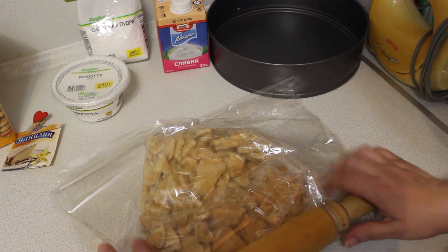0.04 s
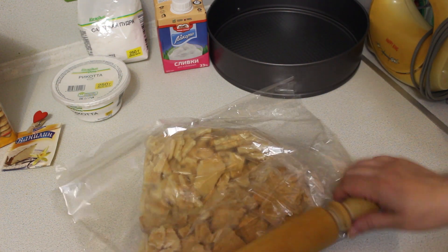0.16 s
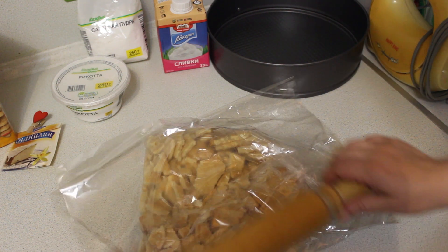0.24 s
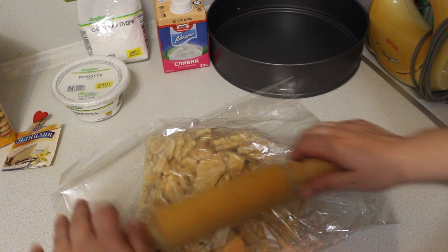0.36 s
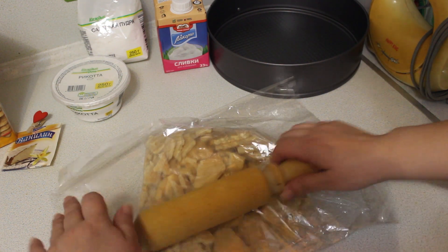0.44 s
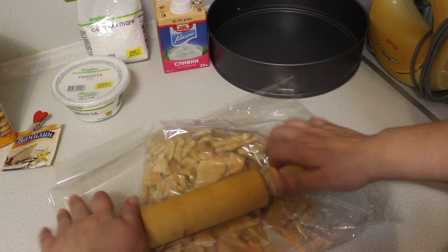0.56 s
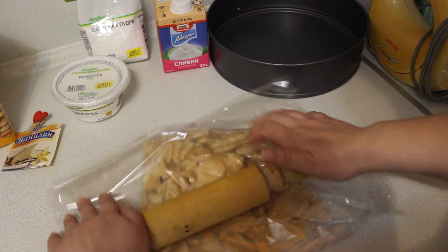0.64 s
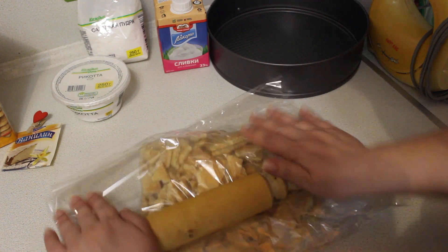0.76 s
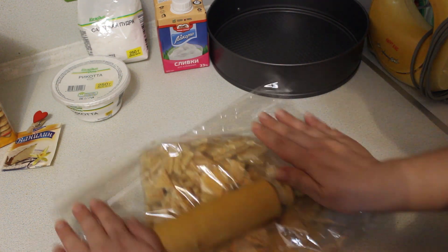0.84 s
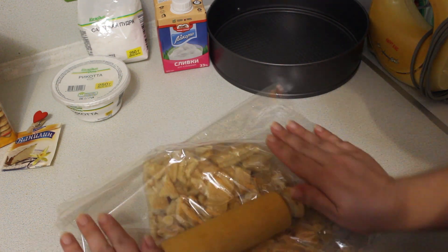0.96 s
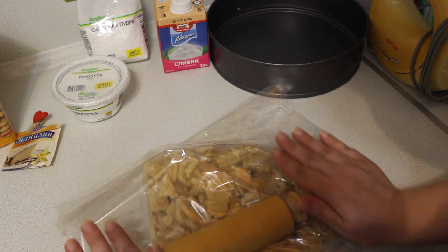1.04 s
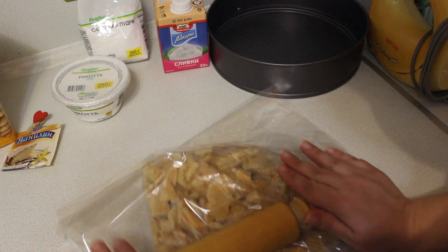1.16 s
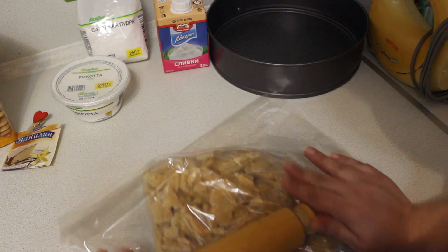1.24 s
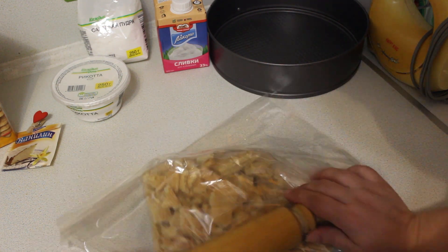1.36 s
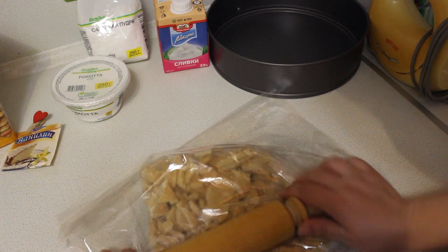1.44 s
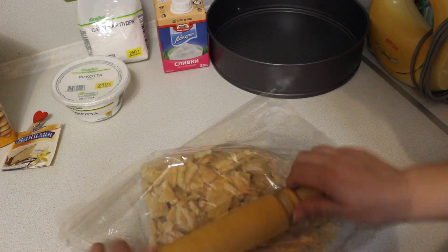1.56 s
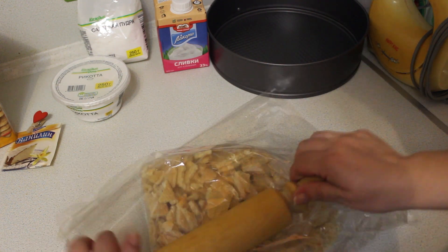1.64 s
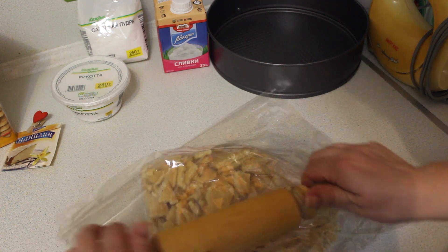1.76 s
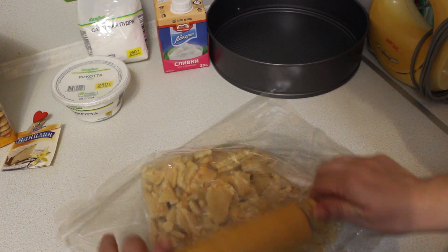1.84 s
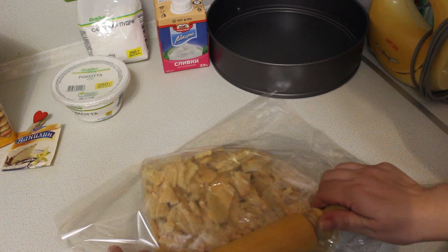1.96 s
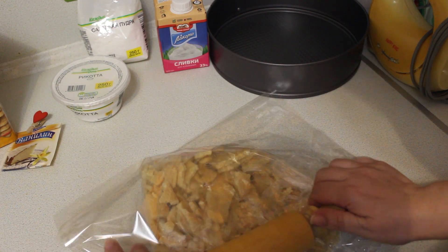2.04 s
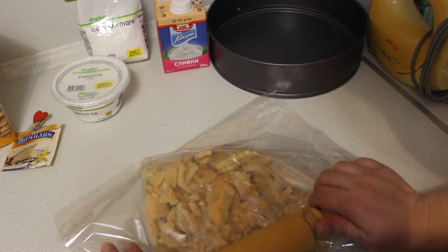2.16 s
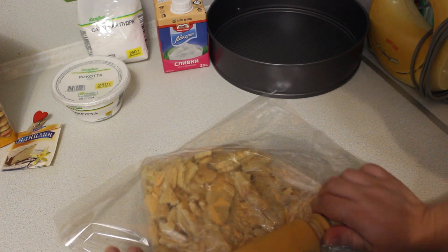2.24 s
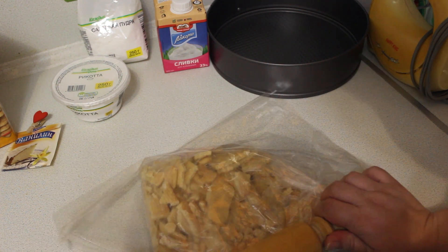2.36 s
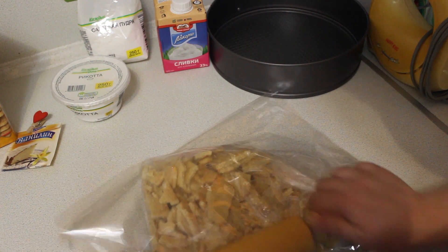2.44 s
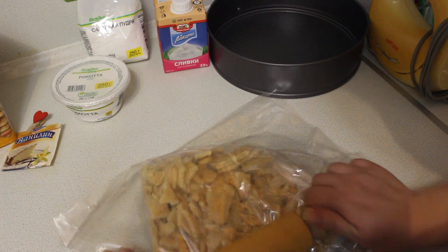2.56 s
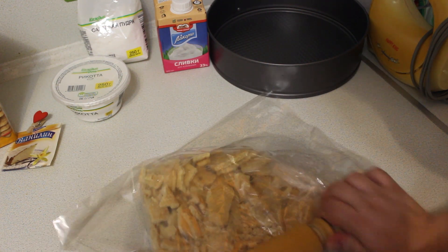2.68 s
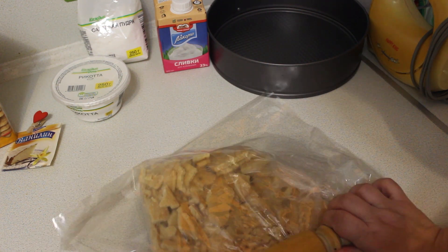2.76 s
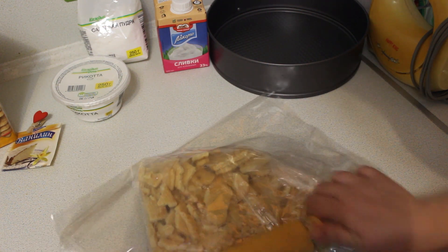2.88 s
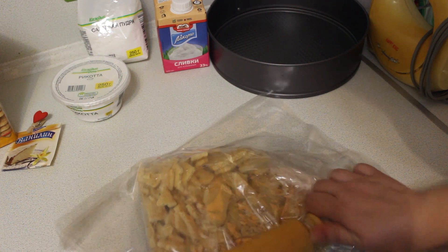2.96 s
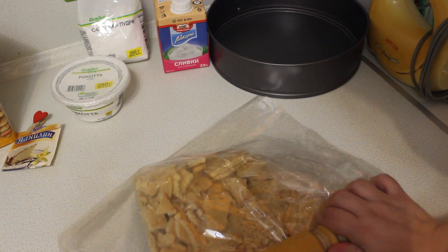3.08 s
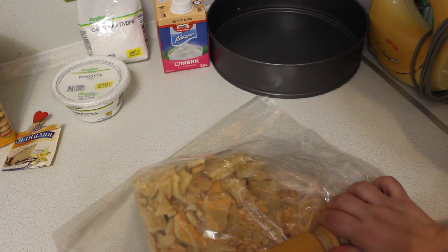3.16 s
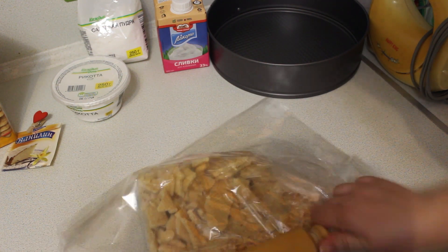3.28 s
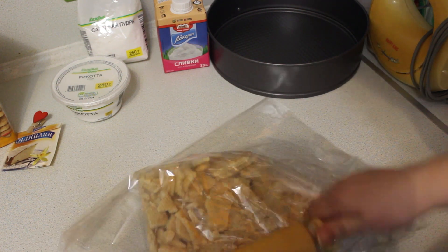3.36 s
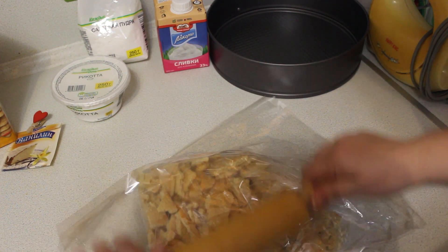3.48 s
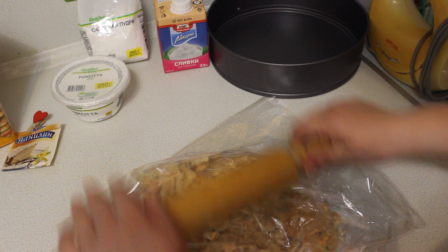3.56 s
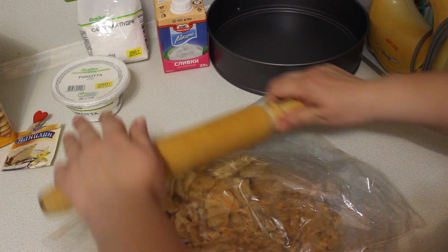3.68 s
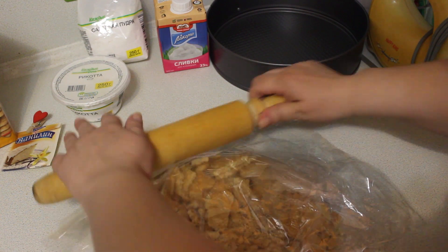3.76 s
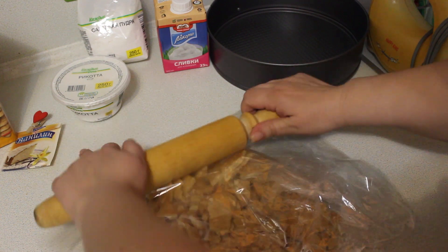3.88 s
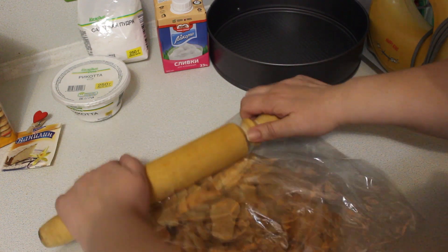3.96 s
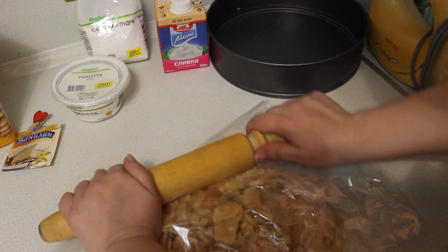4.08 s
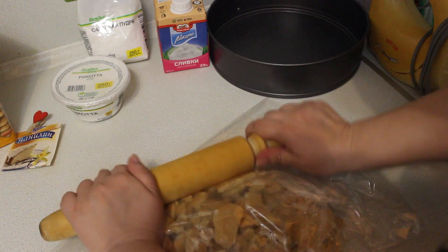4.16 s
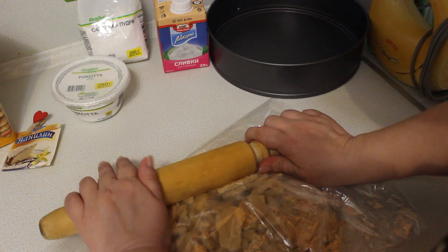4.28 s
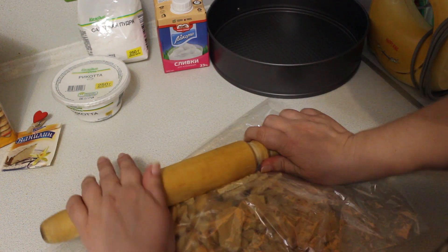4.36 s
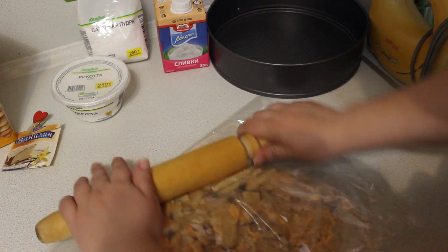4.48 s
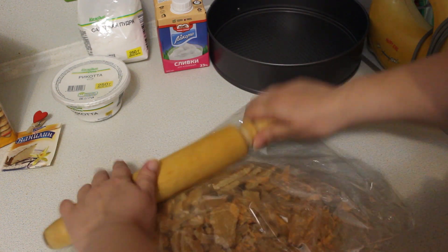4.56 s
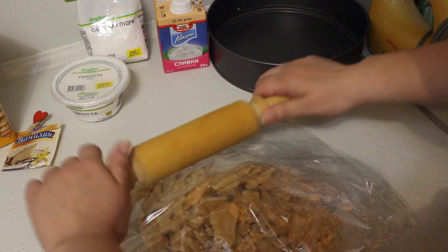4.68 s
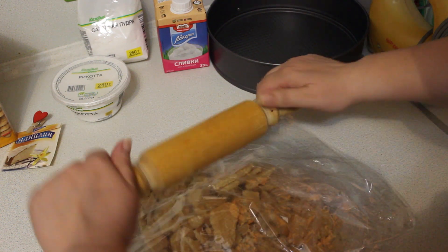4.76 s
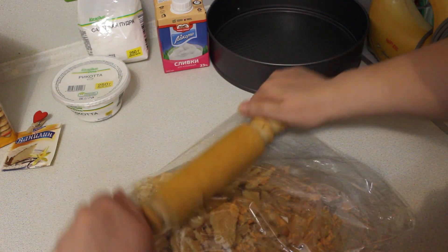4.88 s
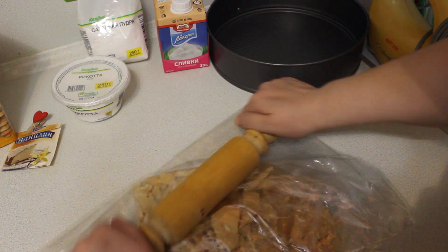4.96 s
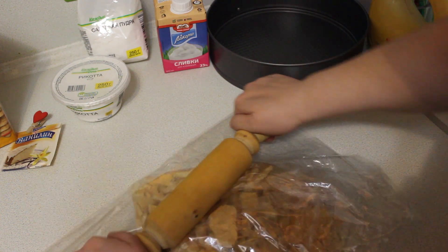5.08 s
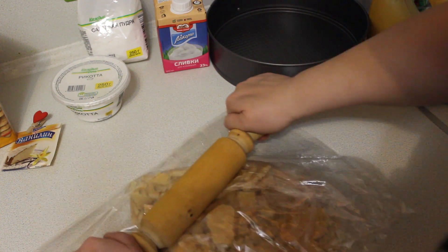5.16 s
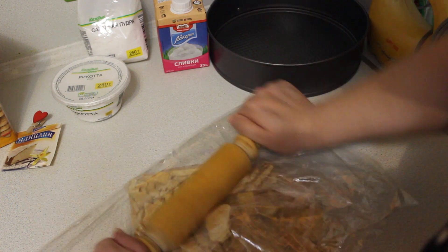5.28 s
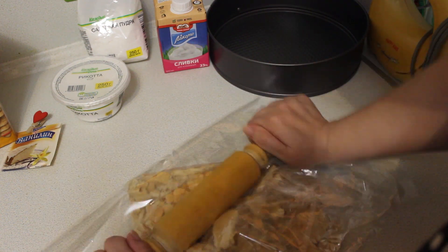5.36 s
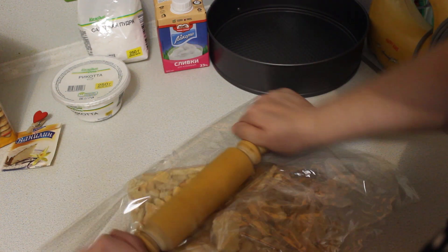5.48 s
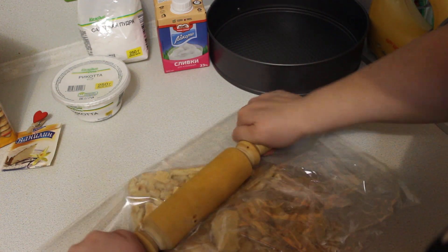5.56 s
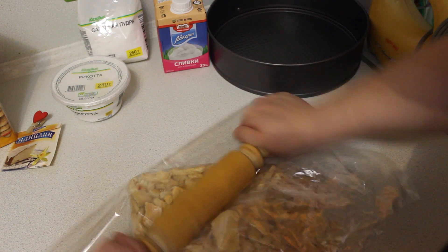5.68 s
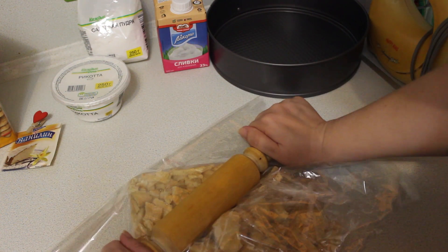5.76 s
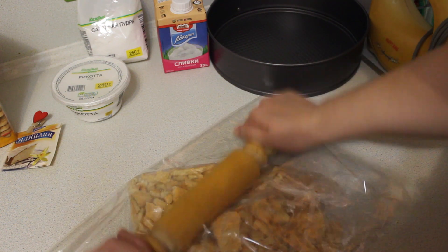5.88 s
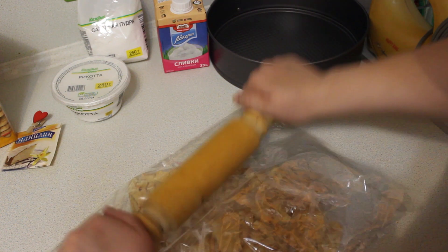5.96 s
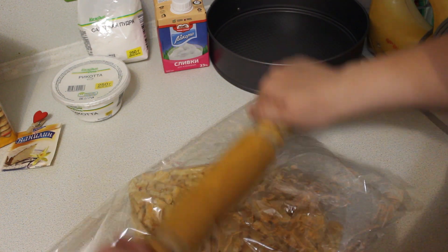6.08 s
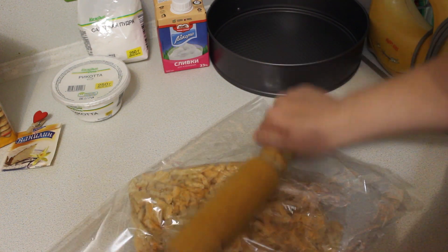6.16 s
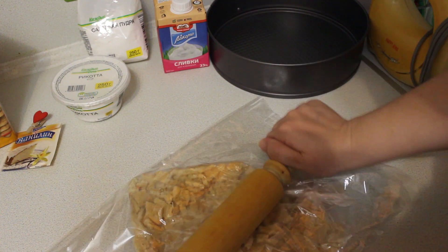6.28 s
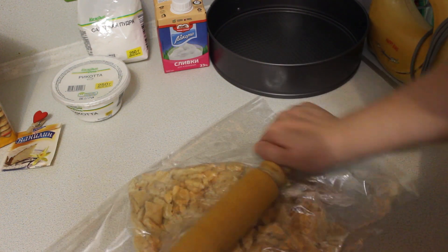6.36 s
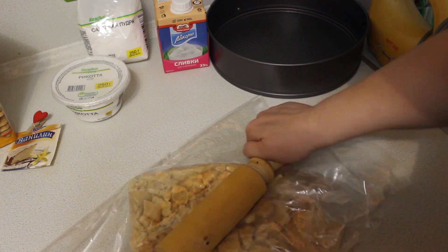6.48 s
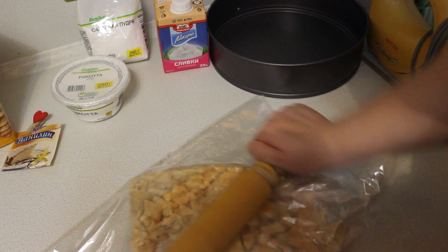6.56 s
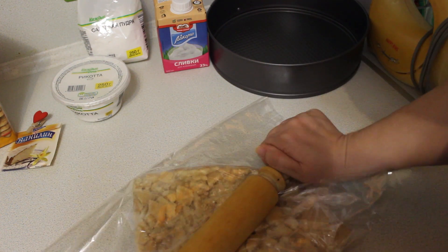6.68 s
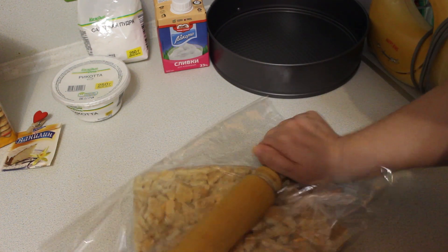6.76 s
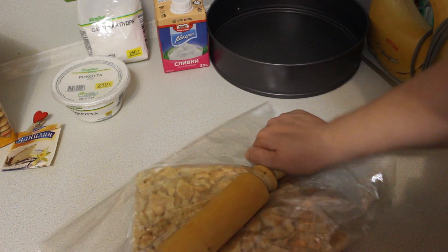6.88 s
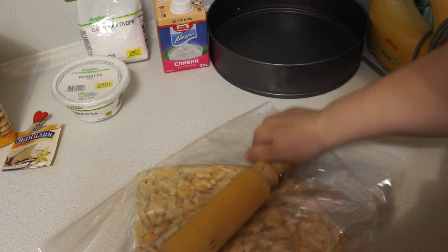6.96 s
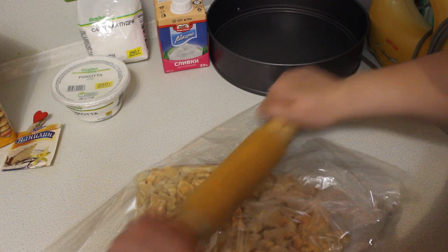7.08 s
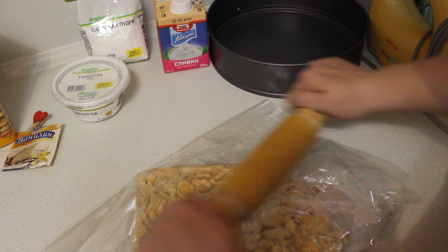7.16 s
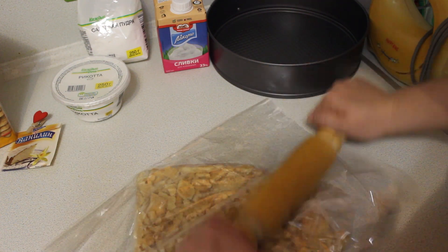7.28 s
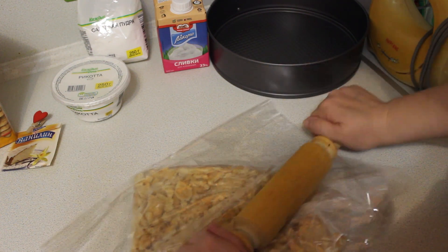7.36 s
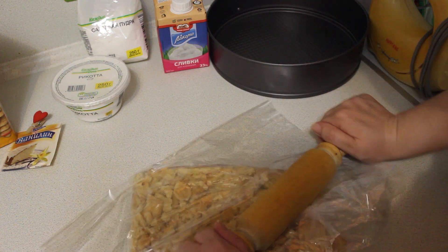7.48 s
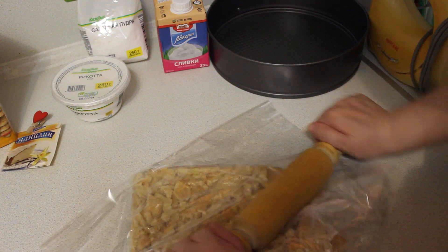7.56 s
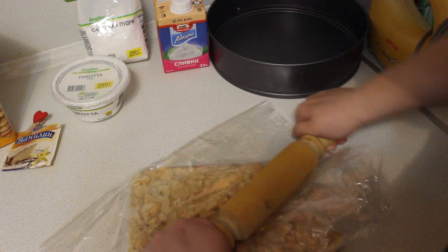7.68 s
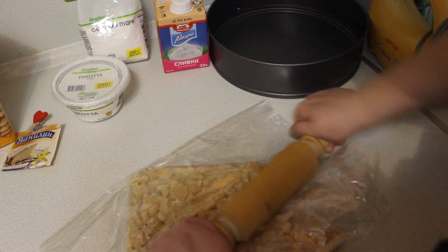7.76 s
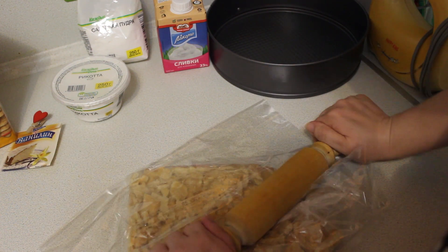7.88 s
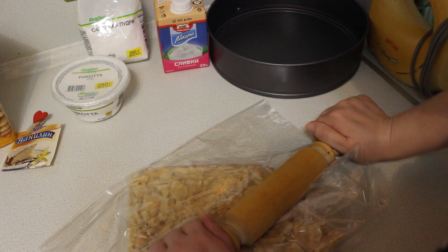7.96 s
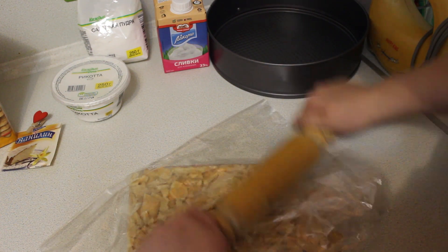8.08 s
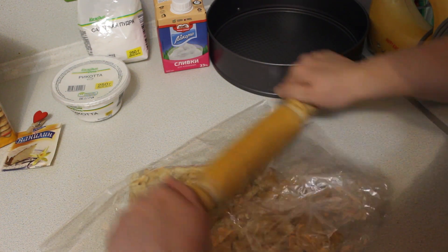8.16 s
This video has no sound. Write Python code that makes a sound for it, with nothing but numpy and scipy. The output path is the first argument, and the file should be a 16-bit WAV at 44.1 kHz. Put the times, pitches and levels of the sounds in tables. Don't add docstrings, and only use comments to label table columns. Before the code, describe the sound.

Close, dry crunching of cookies crushed in a crackling plastic bag by a rolling pin, counter thudding dully, in a small quiet kitchen.

```python
import sys
import numpy as np
from scipy import signal
from scipy.fft import rfft, irfft, next_fast_len
from scipy.io import wavfile
from scipy.ndimage import uniform_filter1d, map_coordinates

SR = 44100
rng = np.random.default_rng(int(sys.argv[2]) if len(sys.argv) > 2 else 0)


def volts(x):
    e = np.asarray(x, float) / 20
    return 10 ** e


def int16_out(signal):
    q = np.round(np.clip(np.atleast_2d(signal).T, -1, 1) * 32767)
    wavfile.write(sys.argv[1], SR, q.astype(np.int16))


N = 362766

# time of most pressure [t/s], strength [level/dB], rise by 10 dB [ms],
# fall by 10 dB [ms], weight on whole cookies [level/dB]
PASSES = [(0.002, -42, 14, 97, -1.5), (0.103, -46.5, 57, 31, -8), (0.195, -39, 20, 25, -4.5),
          (0.235, -57, 6, 18, 14), (0.273, -39.5, 75, 91, -2), (0.36, -45.5, 64, 29, -7),
          (0.549, -41, 16.5, 406, 0), (0.744, -44.5, 39, 33, 2), (0.811, -44, 96, 54, 8),
          (0.903, -48.5, 14, 452, 4.5), (0.997, -50, 25, 51, 9), (1.11, -42, 159, 201, 3.5),
          (1.263, -46, 142, 45, 2), (1.379, -43, 32, 390, 0.5), (1.515, -41.5, 32, 93, -2.5),
          (1.663, -41, 238, 32, -4.5), (1.78, -41.5, 31, 11, -1), (1.828, -41.5, 235, 45, -9),
          (1.965, -39.0, 49, 73, -0.5), (2.065, -46, 22, 27, 3.5), (2.161, -48.5, 89, 110, 5),
          (2.268, -43.5, 23, 126, 5.5), (2.31, -47, 10, 35, 3), (2.414, -44, 89, 26, -3.5),
          (2.495, -44.5, 8, 93, 1), (2.571, -38.5, 78, 83, 3.5), (2.662, -41, 29, 200, 0.5),
                 (2.849, -42.5, 150, 18, 3), (2.911, -50.5, 22, 34, 7.5), (2.973, -39.5, 72, 83, -2),
                 (3.12, -40.5, 78, 72, -6), (3.227, -49, 110, 23, 2), (3.31, -43.5, 19, 44, 4),
                 (3.375, -39.5, 84, 54, -3), (3.54, -44, 12, 18, 1), (3.57, -38.5, 25, 18, -10),
                 (3.6, -44.5, 360, 250, -6), (3.712, -39.5, 19, 17, -20), (3.832, -45.5, 130, 70, -43.5),
                 (3.911, -43, 9.8, 110, 4), (4.049, -41.5, 79, 28, 7), (4.2, -55.5, 68, 59, 17.5),
                 (4.279, -41, 320, 123, 4.5), (4.535, -43, 75, 116, 6), (4.722, -42.5, 350, 23, -6.5),
                 (4.77, -59, 38, 120, 0), (4.854, -50, 330, 31, -10), (4.948, -49.5, 4.9, 11, -10),
          (5.025, -42.0, 20, 320, 6), (5.104, -42.5, 45, 40, 5.5), (5.185, -41.5, 11, 52, 9),
                  (5.343, -38, 20, 11, -2), (5.453, -40, 220, 39, 8.5), (5.57, -43.5, 150, 260, 6),
                  (5.702, -43, 79, 13, -8), (5.796, -38, 35, 61, 4.5), (5.95, -47, 48, 68, 0),
                  (5.995, -40.5, 27, 71, -6), (6.098, -48, 100, 86, -6.5), (6.278, -40.5, 20, 83, 8.5),
                  (6.365, -46.5, 14, 340, 8.5), (6.439, -42, 18, 40, 4), (6.489, -42.5, 61, 110, 5),
                  (6.564, -43, 94, 30, 3.5), (6.686, -38.5, 88, 34, 3), (6.887, -39.5, 99, 120, 3.5),
                  (7.123, -38.5, 220, 92, -3), (7.333, -43.5, 24, 54, -1), (7.394, -38, 45, 92, -3),
                  (7.582, -44.5, 110, 43, 5.5), (7.706, -38, 68, 116, 4), (7.906, -37.5, 43, 77, -0.5),
                  (8.202, -42.5, 190, 179, -2.5)]
# [t/s], strength [level/dB], weight [level/dB]
JOLTS = [(0.339, -42.5, -6), (0.599, -44.0, -5), (0.832, -45, 0.0), (0.994, -48, -1.0), (1.11, -44.0, 5),
         (1.221, -47, 2), (1.275, -44.0, 0.0), (1.399, -40.5, -1), (1.485, -43, -1), (1.575, -43.0, 0),
         (1.64, -45, 3.5), (2.115, -51, -2), (2.159, -47, 2.0), (2.781, -46, -9), (3.043, -46, -5),
         (3.103, -46, -2.0), (3.127, -46.0, 0.0), (3.253, -51, -5.0), (3.497, -43, -4.0), (3.647, -44, -4),
         (3.811, -49, -7), (3.835, -49.0, -8), (3.901, -45, -9), (4.293, -43, 2.0), (4.372, -50, -3),
         (4.724, -45, -8), (4.789, -52.0, -5.0), (4.828, -53, -7.0), (5.095, -44, 2.0), (5.389, -45, 9),
         (5.804, -43.0, 4.0), (6.19, -56, -3.0), (6.381, -44.0, 4), (6.697, -42, 1), (6.815, -48, 2.0),
         (6.923, -44, -2), (6.98, -44, -1.0), (7.109, -43, -2), (7.26, -52, -1.0), (7.402, -40, 5),
         (7.474, -46, -1.0), (7.568, -46, 2.0), (7.59, -49, 0), (7.842, -53, -4), (7.914, -42, 1),
         (7.961, -45, 1.0), (8.029, -51.0, 5), (8.098, -49, 2.0), (8.193, -46, -5)]
# [t/s], peak [level/dB], time to fade by 60 dB [s]
SURGES = [(0.1739, -34, 0.1), (0.526, -27, 0.19), (0.9831, -35, 0.086), (1.3735, -25, 0.18),
          (2.2462, -34, 0.15), (2.2624, -25, 0.065), (2.4786, -23.5, 0.076), (2.9017, -42, 0.092),
          (3.529, -24.5, 0.1), (3.705, -36, 0.11), (3.8813, -26, 0.1), (4.9387, -43, 0.08),
          (4.9472, -46, 0.05), (5, -27.5, 0.1), (5.1755, -34, 0.15), (5.7604, -25.5, 0.1),
          (5.9778, -20.5, 0.12), (6.237, -33, 0.15), (7.3094, -32, 0.061)]
# [t/s], brightness [level/dB]
TAUT = [(0, -0.5), (.4, 1), (.9, -1), (1.4, -0.8), (1.8, 0), (2.1, -1), (2.35, -2.5), (2.8, -2.5),
        (3.5, 0.5), (4.1, -1.5), (4.9, 0.5), (5.3, -0.5), (5.75, 0), (6.4, -1), (7, -0.5), (7.5, -2.5),
        (7.85, -1.3), (8.23, 0)]
# [f/Hz], density [level/dB per Hz]
FILM_COLOUR = [(200, -40), (500, -27), (1000, -10), (1800, -5), (2400, -6.5), (3500, -3.5), (5000, -5.5),
               (7300, -6), (10000, -7.5), (13300, -10.5), (15000, -14.5), (15800, -14)]
# [t/s], air pocket pitch [f/Hz], how closed the pocket is [0-1],
# crumbs [level/dB], contact with the counter [level/dB]
HEAP = [(0.0, 1440, 0.9, 1.5, 7), (0.57, 1350, 0.3, -2.5, -3.5), (1.1, 1460, 0.2, 1, -2),
        (1.35, 1420, 0.75, 2.5, -0.5), (1.65, 1430, 0.6, 6.5, -5.5), (2.38, 1420, 0.2, -3.5, 3),
        (2.72, 1400, 0.3, -0.5, 2.5), (2.85, 1380, 0.87, 3.5, 3), (3.57, 1400, 0.9, 5.5, 0.5),
        (3.78, 1510, 0.3, -16, -5), (4.08, 1220, 0, 0, -1.5), (4.21, 1160, 0.3, 1.5, -1),
        (4.6, 1200, .3, -1, -3), (4.85, 1200, 0, -19, -7), (5.03, 1240, 0, 0, -4),
        (5.15, 1300, 0.05, -1, -3), (5.4, 1320, 0.04, 3, -0.5), (5.59, 1220, 0.17, 3, -6),
        (5.89, 1300, 0, 6.5, -7.5), (6.14, 1300, 0.4, -2.5, 6), (6.62, 1380, 0.1, 5, 2.5),
        (6.95, 1320, .3, 3, -2.5), (7.25, 1180, 0.7, 1, -16), (7.4, 1220, .6, 5, -1),
        (7.67, 1310, 0.4, 0.5, 1), (7.95, 1330, 0.6, 5.5, -1), (8.23, 1180, 0.3, 6, -11)]
# [f/Hz], width [Hz], [level/dB]
PIN = [(334, 110, -7), (489, 93, 0.5), (726, 87, -0.5), (827, 41.5, 2), (1065, 194, -7)]
# [f/Hz], width [Hz], [level/dB]
COUNTER = [(51.4, 9.9, -22), (69.8, 6.3, -6.5), (96.3, 9.4, -3), (189.6, 25, 5), (269, 35, 3),
           (322, 75, -4.5)]
# [f/Hz], density [level/dB per Hz]
AIR = [(25, 8), (60, -28), (200, 10), (500, 10), (2000, -5), (8000, -41), (16000, -23)]
# [f/Hz], width [Hz], [level/dB]
HUM = [(344.6, 37, 6.5), (188, 28, -7), (100, 30, 0)]
# [t/s], peak [level/dB], pitch [f/Hz]
SNAPS = [(0.2604, -15.5, 4070), (0.354, -16, 9600), (0.627, -22, 3550), (0.9936, -14, 7850),
         (1.1102, -22, 7140), (1.2252, -20, 3500), (1.2428, -15, 5700), (2.311, -23, 4000),
         (2.59, -19, 4500), (2.4092, -16.5, 9200), (2.7017, -19, 2980), (2.78, -17, 5340),
         (2.9038, -16.5, 3370), (3.086, -21, 3600), (3.219, -22, 4400), (3.25, -24, 4100),
         (3.3732, -10, 8100), (3.7102, -17, 5160), (3.8821, -26, 2870), (4.7263, -16, 6730),
         (5.7617, -15, 12300), (5.9785, -25, 4160), (6.7, -12.5, 9400), (6.9824, -19, 7600),
         (7.7951, -19, 5800), (7.8317, -18, 10200), (8.028, -29, 2950)]
# [t/s], peak [level/dB], pitch [f/Hz]
TICKS = [(0.42, -32, 3900), (0.4607, -32, 7300), (0.5203, -35, 11400), (0.769, -28, 3000),
         (0.984, -27, 7300), (1.2157, -28, 6300), (2.4782, -32, 4000), (4.0317, -23, 4400),
         (4.9476, -36, 3300), (7.2828, -38, 4400), (7.3014, -42, 6400)]
# [t/s], peak [level/dB], pitch [f/Hz]
CRACKS = [(0.0339, -31, 4500), (0.1569, -40, 5600), (0.1751, -31, 5200), (0.2526, -22, 5600),
          (1.0308, -29, 4900), (1.3845, -18.5, 6800), (1.3929, -22, 6900), (1.5796, -22, 6100),
          (1.6357, -20, 5100), (1.6798, -20, 5800), (1.8084, -28, 4200), (1.8712, -31, 5700),
          (1.9019, -36, 7800), (1.9752, -17, 4800), (2.0594, -31, 4500), (2.3756, -30, 3900),
          (2.3892, -31, 5600), (2.3964, -28, 5200), (2.4961, -27, 5700), (2.548, -23, 5700),
          (2.7312, -24, 4100), (2.84, -31, 4750), (2.9746, -25, 5070), (3.1842, -32, 6300),
          (3.4342, -29, 4500), (3.4807, -21.5, 4500), (3.5145, -25, 3900), (3.5305, -23, 6700),
          (3.9319, -28, 5000), (3.9459, -32, 6150), (4.067, -26, 7400), (4.2672, -29, 4500),
          (4.3239, -27, 8870), (4.37, -27, 4940), (4.4308, -35, 6460), (4.4599, -36, 6600),
          (4.5206, -26, 6300), (4.9396, -41, 4930), (5.1279, -27, 5500), (5.1941, -27, 9000),
          (5.245, -30, 5200), (5.3398, -30, 4800), (5.6337, -28, 4800), (6.0504, -30, 6100),
          (6.0983, -28, 5570), (6.403, -33, 3000), (6.5507, -27, 4600), (6.649, -27, 4900),
          (6.6898, -22, 5900), (6.838, -30, 4000), (6.8964, -23, 4500), (7.6161, -35, 6100),
          (7.6408, -36, 4500), (7.9602, -24, 6800), (7.9876, -31, 6700), (8.0714, -36, 5800),
          (8.1385, -30, 5900), (8.1566, -28, 6000)]
# [t/s], peak [level/dB], hollow knock [level/dB],
# deep boom [level/dB]
THUDS = [(0.22, -30.5, -1, -28), (0.233, -32, -6, -25), (0.248, -37, -1, -25), (0.545, -50, 14, -13),
         (1.964, -42, -1, -23), (2.143, -33, -11, -8), (2.156, -34, -12, -13), (2.258, -34, -4, -23),
         (2.56, -30, -11, -24), (4.009, -48, 19, -22), (4.19, -30.5, 3, -16), (5.789, -33, -12, -16),
         (6.287, -33, 5, -6), (6.378, -34, -10, -18), (6.465, -32.5, 5, -11), (6.651, -31, -12, -30),
         (7.391, -33, -1, -11), (7.657, -35, 0, -28), (7.883, -35, -3, -27)]
# [f/Hz], time to fade by 60 dB [s]
KITCHEN = [(150, 0.28), (1000, 0.17), (5000, 0.027), (14000, 0.15)]


def unit(x):
    return x / np.sqrt(np.mean(x ** 2) + 1e-20)


def along(points, hz):
    f, v = np.transpose(points)
    return np.interp(np.log(hz + 1), np.log(f + 1), v)


def curves(rows):
    s, *columns = np.transpose(rows)
    return [np.interp(np.arange(N) / SR, s, column) for column in columns]


def wobble(rate):
    knots = rng.standard_normal(int(N / SR * 200) + 4)
    return map_coordinates(knots, [np.arange(N) * rate / SR])


def filtered(x, response):
    m = next_fast_len(N + SR // 2)
    return irfft(rfft(x, m) * response(np.fft.rfftfreq(m, 1 / SR)), m)[:N]


def body(modes, soft_hz=np.inf):
    def response(f):
        total = 0
        for k, (centre, width, db) in enumerate(modes):
            ring = 1j * f * width / (centre * centre - f * f + 1j * f * width)
            total = total + (-1) ** k * volts(db) * ring
        return total / (1 + 1j * f / soft_hz) ** 2
    return response


def gripped(x, modes, soft_hz):
    grip = np.clip(wobble(rate=4), -1, 1)
    total = 0
    for k in (-1, 0, 1):
        share = np.sqrt(np.clip(1 - np.abs(grip - k), 0, 1))
        response = body(modes)
        tuned = lambda f: response(f * (1 - k * .05)) / (1 + 1j * f / soft_hz) ** 2
        total = total + filtered(x * share, tuned)
    return total


def pings(s, gain, hz, cycles, size=48):
    turns = np.arange(size) / SR * hz[:, None]
    fade = np.exp(-turns / cycles) * np.minimum(2 * turns, 1)
    shape = gain[:, None] * np.sin(2 * np.pi * turns) * fade
    at = np.round(s * SR).astype(int)[:, None] + np.arange(size)
    return np.bincount(at.ravel(), shape.ravel(), N + SR)[:N]


def fractures(count, spread_db):
    when, side, big = rng.random((count, 3)).T
    size = volts(-spread_db * np.log(np.maximum(1 - big, .002)))
    return when * N / SR, np.sign(side - .5) * size


def impulses(count, spread_db):
    s, gain = fractures(count, spread_db)
    return unit(np.bincount((s * SR).astype(int), gain, N)[:N])


def pushes(offset_db, share, steep):
    jolts = [(s, db, 8.4, 12.5, weight_db) for s, db, weight_db in JOLTS]
    rows = np.transpose(PASSES + jolts)
    s, db, rise_ms, fall_ms, weight_db = rows[:, :, None]
    t = np.arange(0, N + 64, 64) / SR
    before = (s - t) / np.maximum(rise_ms, 4)
    after = (t - s) / np.maximum(fall_ms, 4)
    away = np.where(t < s, before, after) * 1000
    power = np.sum(volts(db + share * weight_db - 10 * steep * away) ** 2, axis=0)
    return offset_db + np.interp(np.arange(N) / SR, t, 10 * np.log10(power + 1e-12))


def creases():
    s, gain = fractures(count=900, spread_db=1.8)
    fade_ms = 2.5
    fade = np.exp(-np.arange(SR // 10) / SR * 1000 / fade_ms)
    starts = np.bincount((s * SR).astype(int), gain ** 2, N)[:N]
    power = np.abs(signal.fftconvolve(starts, fade)[:N])
    return power / power.mean()


def surges():
    t = np.arange(0, N + 16, 16) / SR
    power = 0
    for s, db, t60 in SURGES:
        fade_db = 60 * np.abs(t - s) / max(t60, .01)
        power = power + (t > s) * volts(db - fade_db) ** 2
    return np.repeat(power, 16)[:N]


def film():
    level_db = pushes(offset_db=0.17, share=0.0057, steep=1.062)
    bright_db = -5.5 + curves(TAUT)[0] + 0.18 * (level_db + 47) + 0.14 * wobble(7.6)

    s, gain = fractures(count=24000, spread_db=.8)
    hz = np.clip(5000 * np.exp(0.716 * rng.standard_normal(len(s))), 600, 17000)
    buckles = rfft(pings(s, gain * np.sqrt(hz), hz, cycles=1.16, size=64))
    flat = irfft(buckles / uniform_filter1d(np.abs(buckles), size=2001), N)
    sheet = unit(flat) + volts(.6) * rng.standard_normal(N)
    sheet = filtered(sheet, lambda f: volts(along(FILM_COLOUR, f)))
    top = filtered(sheet, lambda f: np.clip((f - 7000) / 3000, 0, 1))

    clumps = volts(0.23 * wobble(12) + 0.72 * wobble(60))
    power = volts(level_db + 2.5) ** 2 + volts(-15) ** 2 * surges()
    giving = creases()
    low_burst = np.sqrt(1 + volts(-13) ** 2 * giving)
    top_burst = np.sqrt(1 + volts(-9) ** 2 * giving)
    crackle = low_burst * (sheet - top) + top_burst * volts(bright_db + 4) * top
    return np.sqrt(power) * clumps * unit(crackle)


def crumbs(breaks, pocket_hz, closed, crumbs_db):
    light_db = pushes(offset_db=-5.5, share=0.89, steep=1.11)
    pocket = 0
    for hz in range(800, 2001, 200):
        near = np.clip(1 - np.abs(pocket_hz - hz) / 200, 0, 1)
        pocket = pocket + near * filtered(breaks, body([(hz, 140, 0)]))
    loose = filtered(breaks, body([(1380, 1140, 0)]))
    level = np.hypot(volts(light_db + crumbs_db - 5.0), volts(-20.5) * np.sqrt(surges()))
    return level * (np.sqrt(closed) * unit(pocket) + np.sqrt(1 - closed) * unit(loose))


def ringing_pin(breaks):
    deep_db = pushes(offset_db=-9.5, share=0.93, steep=1.16)
    blows = breaks + 0.67 * impulses(count=2500, spread_db=1.5)
    return volts(deep_db) * unit(gripped(blows, PIN, soft_hz=9000))


def loaded_counter(contact_db):
    load_db = pushes(offset_db=-16, share=1.25, steep=1.16)
    yields = impulses(count=2500, spread_db=2.0)
    until = np.array(THUDS)[:, :1] + .005 - np.arange(0, N, 32) / SR
    lifted = ((until > 0) & (until < .045)).any(axis=0)
    yields = yields * np.where(np.repeat(lifted, 32)[:N], .25, 1)
    load = volts(load_db + contact_db - 3.0) * yields
    usual = np.std(filtered(yields, body(COUNTER, soft_hz=420)))
    return gripped(load, COUNTER, soft_hz=415) / usual


def crunch():
    breaks = impulses(count=12000, spread_db=1.07) * volts(1.7 * wobble(30))
    pocket_hz, closed, crumbs_db, contact_db = curves(HEAP)
    closed = np.clip(closed, 0, 1)
    light = crumbs(breaks, pocket_hz, closed, crumbs_db)
    return light + ringing_pin(breaks) + loaded_counter(contact_db)


def air_floor():
    return volts(-77.5) * unit(filtered(rng.standard_normal(N), lambda f: volts(along(AIR, f))))


def appliance_hum():
    hum = filtered(rng.standard_normal(N), lambda f: body(HUM)(f) ** 2)
    return volts(-72.5 + 3.2 * wobble(2.95)) * unit(hum)


def snaps():
    s, db, hz = np.vstack([SNAPS + TICKS, np.add(CRACKS, [0, 2, 0])]).T
    ping = -pings(s, volts(db + 3), hz, cycles=.6)
    is_crumb = np.arange(len(s)) >= len(SNAPS + TICKS)
    db = db - 5 * is_crumb
    lag, detune, size = rng.random((len(s), 3, 24)).transpose(1, 0, 2)
    wake_s = s[:, None] + 0.0089 * lag ** 0.64
    wake_db = db[:, None] - 9.5 - 14 * lag - 5 * size
    wake_hz = np.clip(hz[:, None] * np.exp(2.0 * (detune - .3)), 1500, 16000)
    wake = pings(wake_s.ravel(), volts(wake_db).ravel(), wake_hz.ravel(), cycles=1.7)
    return filtered(ping + wake, lambda f: (1j * f / (900 + 1j * f)) ** 2)


def thuds():
    low, hollow, boom = np.zeros((3, N))
    for s, db, knock_db, boom_db in THUDS:
        at = round((s + .005) * SR)
        low[at] = volts(db + 34.5)
        hollow[at] = volts(db + knock_db + 32.5)
        boom[at] = volts(db + boom_db + 51)
    top = filtered(low, body(COUNTER[3:], soft_hz=600))
    cupboard = filtered(boom, body(COUNTER[:3], soft_hz=300))
    return top + cupboard + filtered(hollow, body(PIN, soft_hz=800))


def kitchen(x):
    hz, t, z = signal.stft(rng.standard_normal(SR // 2), SR, nperseg=256)
    fade = volts(-60 * t / along(KITCHEN, hz)[:, None])
    tail = signal.istft(z * fade, SR, nperseg=256)[1]
    late = np.pad(x, (150, 0))
    return signal.fftconvolve(late, tail / np.linalg.norm(tail))[:N]


def scene():
    bag = film() + crunch() + snaps() + thuds()
    mix = bag + volts(-11.0) * kitchen(bag) + air_floor() + appliance_hum()
    return np.tile(mix, (2, 1))


def band_limit(x):
    return signal.sosfilt(signal.butter(12, 16970, fs=SR, output="sos"), x)


def record(dry):
    heard = filtered(dry[0], lambda f: f < 15770) + volts(-74)
    return band_limit(np.tile(heard, (2, 1)))


dry = scene()
out = record(dry)
int16_out(out)
```